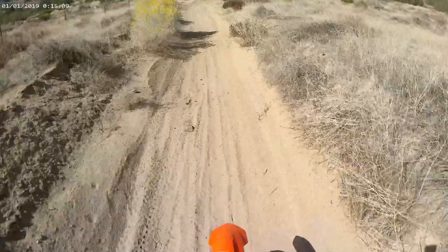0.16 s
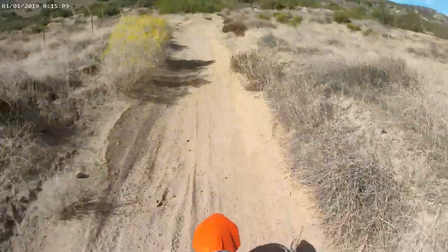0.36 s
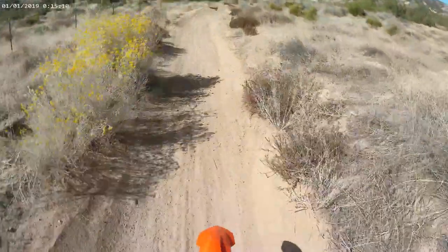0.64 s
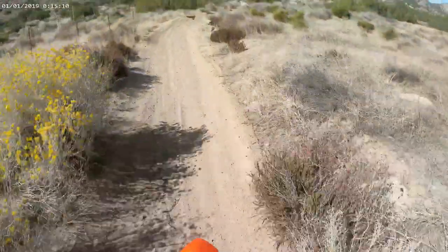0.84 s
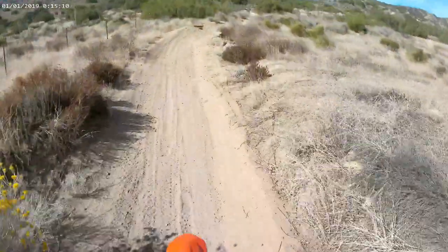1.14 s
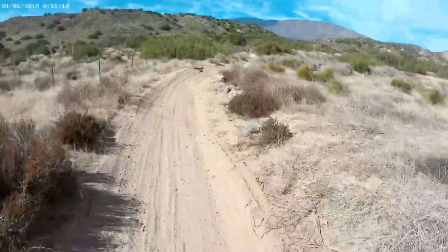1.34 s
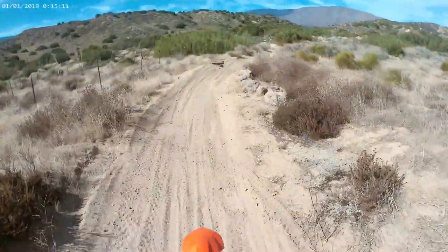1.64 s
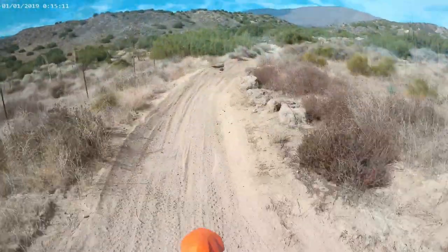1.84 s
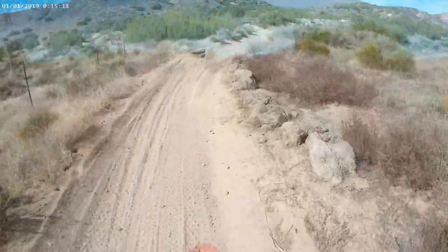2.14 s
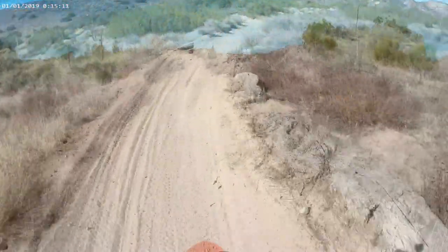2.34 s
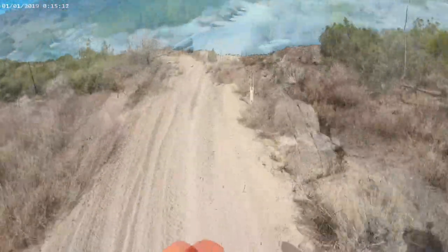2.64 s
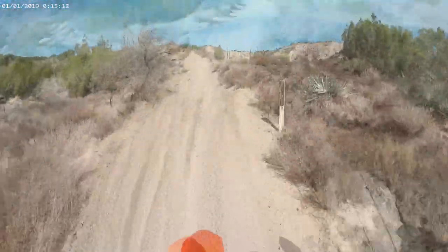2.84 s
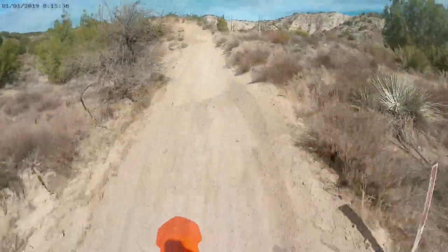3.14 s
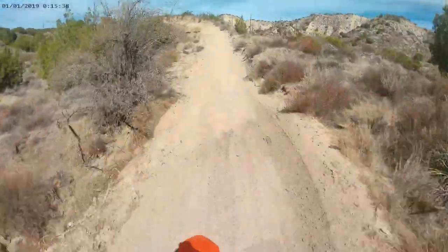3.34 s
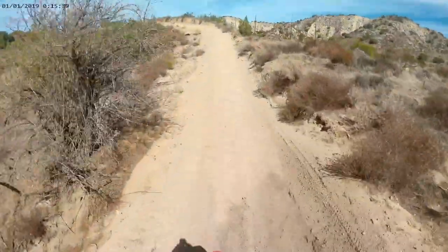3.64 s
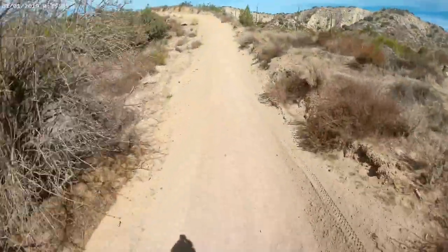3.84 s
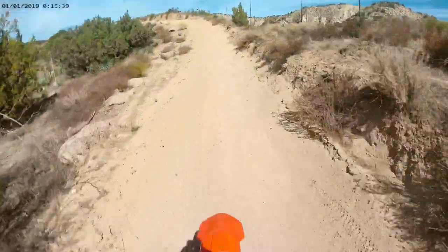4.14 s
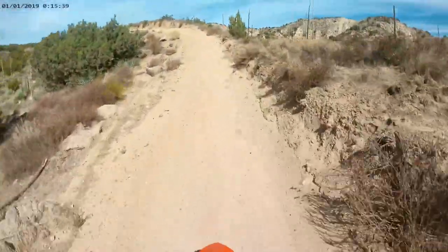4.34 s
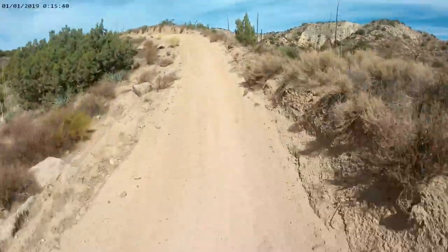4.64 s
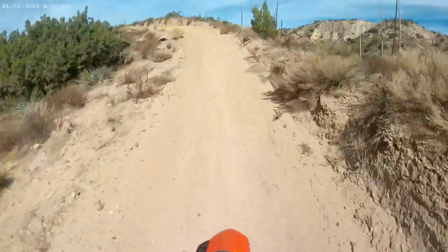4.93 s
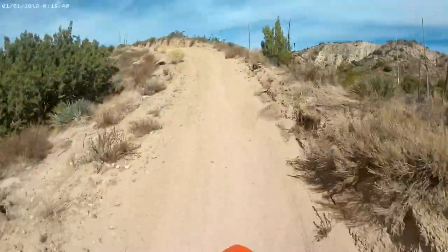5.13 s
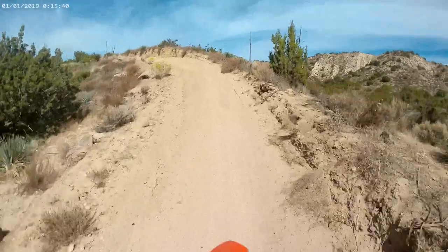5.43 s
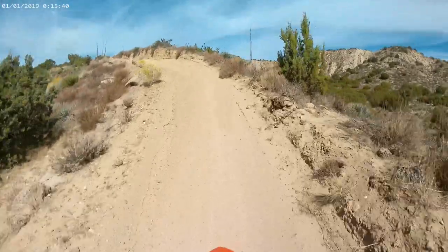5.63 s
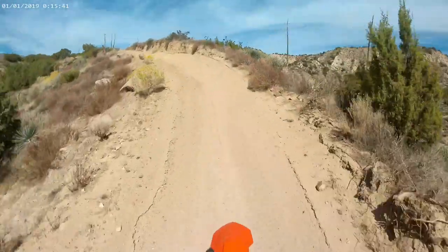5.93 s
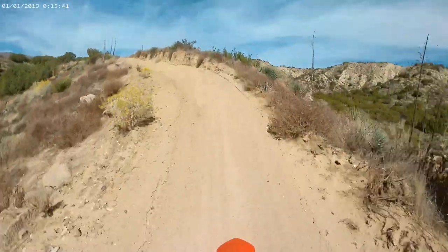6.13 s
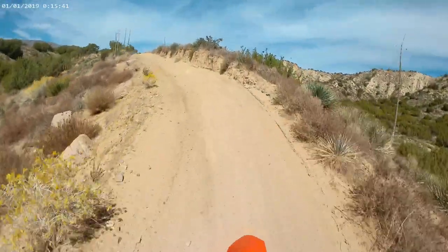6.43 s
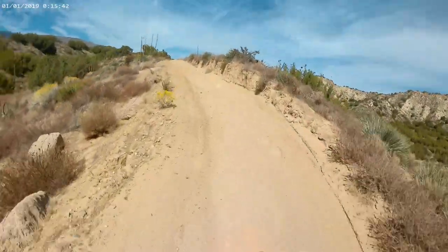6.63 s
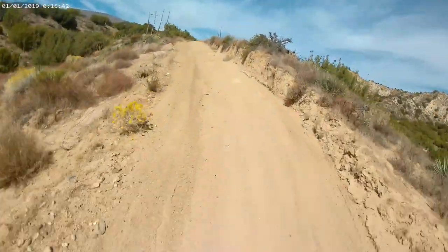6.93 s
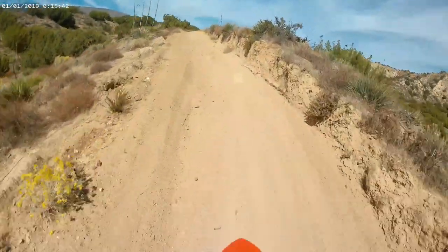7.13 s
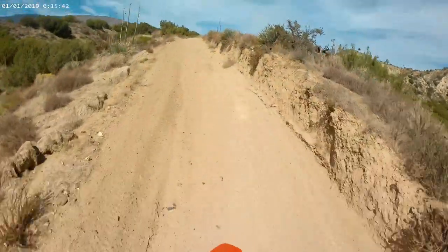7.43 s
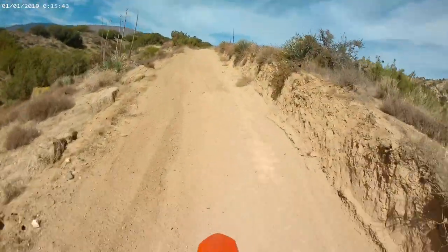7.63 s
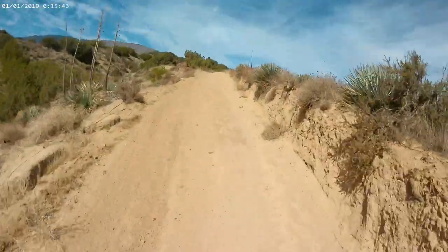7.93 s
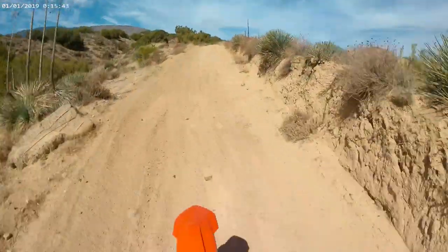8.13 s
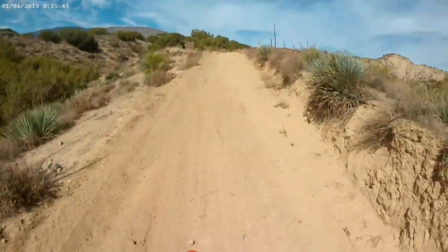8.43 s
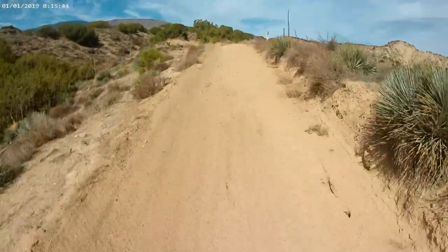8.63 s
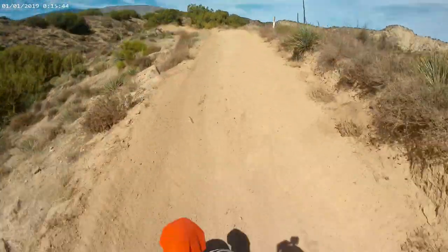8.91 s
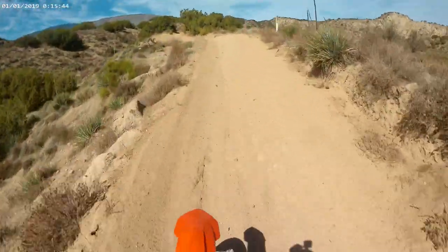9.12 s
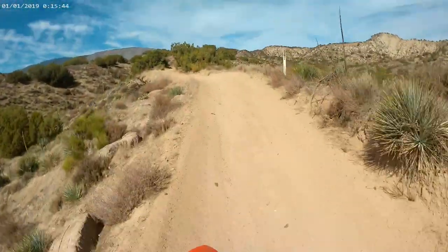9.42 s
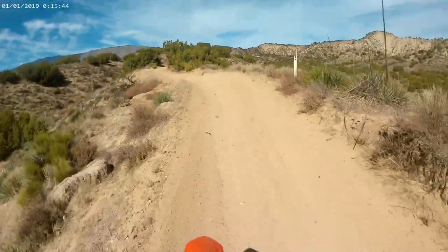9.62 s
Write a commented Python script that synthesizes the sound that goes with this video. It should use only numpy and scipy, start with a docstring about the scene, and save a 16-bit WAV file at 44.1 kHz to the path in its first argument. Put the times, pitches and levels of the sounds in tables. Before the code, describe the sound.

A single-cylinder dirt bike rides a sandy trail outdoors, heard from a camera carried by the rider, close and dry. For the first second the throttle is nearly closed: weak engine thumps, gritty tyre and chain hiss, low wind buffeting and dull knocks near 0.4 and 1.1. At about 1.2 the engine barks open with a coarse rasp and several quick metallic pings until 1.4. It eases from 2 to 2.6, builds to 3.2, then drops briefly around 3.4. From 3.6 it pulls harder, loudest about 4.2 to 4.5, revs fluttering higher near 4.6 to 4.8. Hollow knocks follow, strongest at 5.0, with a stone tick. A steady, rattling climb continues, dipping slightly around 7.1, with bumps near 7 and 7.8 and stone ticks around 8.0 to 8.5. The throttle lifts sharply near 9.0 between two knocks, then returns to a steady pull until the cut at 9.8.

```python
"""Dirt bike on a sandy trail

A single-cylinder dirt bike climbs a sandy trail, heard from a camera carried by the rider.
Each firing rings the exhaust and lets out a rasp of gas; the metal clatters, and chain and tyres hiss as fine grit.
Bumps ring the camera housing, short cracks give engine pings and stones, and low noise buffets the microphone."""
import sys
import numpy as np
from scipy import signal
from scipy.fft import rfft, irfft, next_fast_len
from scipy.io import wavfile
from scipy.ndimage import map_coordinates

SR = 44100
rng = np.random.default_rng(int(sys.argv[2]) if len(sys.argv) > 2 else 0)


def generate_wav(signal):
    """Clip the signal to [-1, 1] and save it as 16-bit WAV at the path in sys.argv[1]."""
    frames = np.transpose(np.atleast_2d(signal))
    scaled = np.clip(frames, -1, 1) * 32767
    pcm = np.round(scaled).astype(np.int16)
    wavfile.write(sys.argv[1], SR, pcm)


N = 430857
TIME = np.arange(N) / SR
SIZE = next_fast_len(N + SR)  # a second of spare room for filter tails
FREQ = np.arange(SIZE // 2 + 1) * SR / SIZE

# Engine speed. Each row: time in seconds, firings per second.
REVS = [(0.0, 22.61), (0.4, 28.39), (0.66, 19.58), (1.2, 24.1), (1.26, 27.18), (1.56, 25.49), (1.92, 27.41),
        (1.98, 32.16), (2.72, 29.17), (3.2, 29.58), (3.5, 23.43), (3.68, 28.34), (3.78, 26.32),
        (4.02, 33.79), (4.36, 30.81), (4.6, 40.88), (4.68, 34.01), (4.74, 41.97), (4.86, 32.86),
        (6.0, 32.68), (6.16, 33.71), (7.1, 30.94), (7.18, 32.42), (7.26, 28.07), (7.54, 34.31),
        (7.74, 29.17), (8.1, 31.68), (8.26, 29.82), (8.7, 35.37), (8.82, 25.66), (9.12, 29.44),
        (9.77, 27.16)]
# Loudness of the exhaust over time. Each row: time in seconds, relative level in dB.
EXHAUST_LEVEL = [(0, -54.5), (.5, -43), (1.02, -53), (1.2, -32.5), (1.91, -33), (2.02, -40.5), (2.6, -39.5),
                 (3.0, -34.5), (3.31, -35.5), (3.43, -43), (3.63, -34), (3.93, -31.5), (4.2, -27.6),
                 (4.46, -27.5), (4.95, -32.5), (5.55, -29), (6.5, -31), (7.1, -33), (8.0, -31),
                 (8.78, -32.5), (8.97, -44), (9.13, -33), (9.77, -32.5)]
# Chain and tyre hiss at a steady pull. Each row: time in seconds, level in dB.
TRAIL = [(0, -39.5), (1.0, -45.5), (1.3, -47), (1.9, -45), (3.5, -47), (4.7, -41.5), (7.2, -45.5),
         (8.1, -40.5), (9.1, -45), (9.77, -44)]
# Strength of the air on the microphone. Each row: time in seconds, relative level in dB.
RIDE = [(0, -28.5), (.75, -26.5), (1.5, -34.5), (3.6, -33.5), (4.25, -29), (5.1, -29), (6.6, -34.5),
        (7.2, -28.5), (9.77, -32)]
# Exhaust resonances at 32 firings a second and average load. Each row: pitch in Hz, width in Hz, level in dB.
PIPE = [(32.3, 4.6, -21), (67, 10, 16), (122.5, 32, -1.5), (219.8, 68, 10), (269.6, 27.3, 8.5),
        (296, 26.7, 7), (442.8, 76, 5.5), (526, 34, -22), (565.6, 42, -4), (622, 20, -9), (827, 100, -9.5),
        (1053, 110, -7.5), (1062, 38, -11)]
# Colour of the gas rasp. Each row: frequency in Hz, relative level in dB.
RASP = [(150, -50), (400, 7), (650, 5.5), (850, -2), (1090, 12), (1300, 0.5), (1520, -6.5), (1680, 3.5),
        (1900, 4.5), (2500, -23.5), (3800, -11), (6000, -23), (9000, -41), (16000, -45)]
# Ringing of the engine's metal. Each row: pitch in Hz, width in Hz, relative level in dB.
METAL = [(1115, 10.8, 10.5), (1509, 77, 6.5), (1813, 32, 4), (1770, 21, -12)]
# Valve blows in each engine cycle. Each row: share of the cycle (0 to 1), relative level in dB.
VALVES = [(0.103, -9), (0.219, -0.5), (0.472, -5.5), (0.631, -1.5), (0.929, 4.5)]
# Colour of the chain and tyre hiss. Each row: frequency in Hz, relative level in dB.
HISS = [(300, 7), (900, 7.5), (2000, 0), (2600, -6), (3450, -3.5), (3750, 7), (4000, 3), (4200, -5),
        (4900, -3.5), (5500, 0), (6250, -3), (6800, -10.5), (9500, -21.5), (15000, -39)]
# Colour of the gusts on the microphone. Each row: frequency in Hz, relative level in dB.
GUSTS = [(5, 1), (16, 3), (31, -6.5), (46, -9.5), (70, -16), (110, -16.5), (280, -27), (1000, -42.5),
         (4000, -82)]
# Knocks over bumps. Each row: start in seconds, relative level in dB,
# basic time to fade by 60 dB in seconds (each housing mode takes its own share of it).
KNOCKS = [(.376, -16, 0.067), (0.628, -21.5, 0.2), (1.076, -11.5, 0.11), (1.113, -14, 0.077),
          (1.289, -11, 0.097), (4.008, -24, 0.22), (4.146, -13, 0.18), (4.85, -11, 0.087), (5.01, -5, 0.15),
          (5.858, -14.5, 0.13), (6.987, -11, 0.078), (7.344, -26, 0.082), (7.784, -11, 0.057),
          (7.969, -17.5, 0.2), (8.941, -14.5, 0.063), (9.117, -15, 0.16)]
# Ringing modes of the camera housing. Each row: pitch in Hz, relative level in dB, share of the fade time.
HOUSING = [(152.1, -1, 0.94), (170, -20, 0.78), (112, -21, 0.9), (320, -18, 0.61)]
# Heavy jolts of the suspension. Each row: start in seconds, relative level in dB, pitch in Hz.
JOLTS = [(0.626, -21, 30.2), (1.19, -23, 31.7), (4.277, -20, 30.6), (4.867, -16.5, 30.6), (5.06, -20, 32.3),
         (7.151, -26, 30.4), (8.189, -28, 31.8), (9.1, -27, 32)]
# Engine pings as the throttle is snapped open at low revs. Each row: start in seconds, level before colouring in dB.
PINGS = [(1.213, -31.5), (1.255, -30.5), (1.294, -29.5), (1.333, -32), (1.368, -22.5)]
# Stones that tick against the bike. Each row: start in seconds, level before colouring in dB.
STONES = [(4.092, -25), (5.014, -28), (7.972, -18), (8.054, -21), (8.117, -17), (8.471, -25)]
# Colour of a tick on the bike's metal. Each row: frequency in Hz, relative level in dB.
TICK = [(400, -9), (1700, 8), (2700, -8), (3900, 2), (6000, -7.5), (9000, -28), (11000, -21), (14000, -53)]

PING_DECAY_S, STONE_DECAY_S = .0061, .002  # seconds to fall to about a third
CLIMB_DB, FLOOR_DB = -30.5, -41  # exhaust level on a steady climb, and where the load levels out
# Rasp on a steady climb in dB and dB per dB of load, before the rasp's own growth and mix level
RASP_DB, RASP_PER_LOAD = -35.5, 1.21
BARK_PER_DB, BARK_S = .58, .45  # rasp dB per dB of surge, and how many seconds the recent mean looks back
CLATTER_DB, CLATTER_PER_LOAD = -41, .7  # clatter on a steady climb in dB, and dB per dB of load
CLATTER_DB_PER_OCTAVE, CLATTER_PER_HISS = 1.5, .61  # dB per doubling of the revs, and dB per dB of trail hiss
HISS_PER_LOAD = .77  # a taut chain and a driven tyre hiss more: dB per dB of load
RASP_WANDER_DB, CLATTER_WANDER_DB, GUST_WANDER_DB = 2.76, 1.6, 2.5  # size of chance swings, several a second
FIRING_WOBBLE = .016  # small random unsteadiness in the timing of the firings, in cycles
TOP_HZ = 15700  # where the treble is cut


def undb(db):
    """Turn decibels into a gain."""
    return 10 ** (np.asarray(db) / 20)


def unit(x):
    """Scale a sound to an average (rms) strength of 1."""
    return x / np.sqrt(np.mean(x ** 2))


def curve(table):
    """Join the points of a two-column table with straight lines, one value per sample."""
    seconds, values = np.transpose(table)
    return np.interp(TIME, seconds, values)


def through(x, response):
    """Filter a sound by a frequency response."""
    return irfft(rfft(x, SIZE) * response, SIZE)[:N]


def resonance(hz, width):
    """Response of one damped ringing mode, with gain 1 at its centre."""
    return 1j * FREQ * width / (hz ** 2 - FREQ ** 2 + 1j * FREQ * width)


def colour(points):
    """Filter with the given outline of (Hz, dB) points that only responds after its input."""
    hz, db = np.transpose(points)
    outline_db = np.interp(np.log(FREQ + 1), np.log(hz), db)
    # folding the cepstrum forward in time gives the filter its minimum delay
    cepstrum = irfft(np.log(undb(outline_db)), SIZE)
    cepstrum[1:SIZE // 2] *= 2
    cepstrum[SIZE // 2 + 1:] = 0
    return np.exp(rfft(cepstrum))


def walk(rate):
    """Smooth random wander through `rate` chance values a second, with a spread near 1."""
    steps = rng.standard_normal(4096)
    return map_coordinates(steps, [TIME * rate], order=2, mode="wrap")


def grains(spread_db):
    """Dense noise whose strength jumps every 32 samples, like tiny grains of unequal size."""
    size_db = spread_db * np.repeat(rng.standard_normal(N // 32 + 1), 32)[:N]
    return unit(rng.standard_normal(N) * undb(size_db))


def crank(rate):
    """Engine cycles turned so far (one firing each), and the seconds since the last firing."""
    turns = np.cumsum(rate) / SR + .48
    turns = turns + FIRING_WOBBLE * walk(11)
    return turns, turns % 1 / rate


def each_cycle(turns, share):
    """The samples at which the engine passes a given point of its cycle."""
    marks = np.arange(1, int(turns[-1]) + 1) + share
    return np.minimum(np.searchsorted(turns, marks), N - 1)


def load(power_db):
    """Load in dB, taken from the exhaust level: near 0 on a steady climb, levelling out when quiet."""
    return 20 * np.log10(np.hypot(undb(power_db), undb(FLOOR_DB))) - CLIMB_DB


def surge(load_db):
    """How far the load stands above its recent mean, in dB."""
    keep = np.exp(-1 / (BARK_S * SR))
    rise_db = load_db - load_db[0]
    recent_db = signal.lfilter([1 - keep], [1, -keep], rise_db)
    return np.maximum(rise_db - recent_db, 0)


def exhaust(turns, rate, power_db):
    """Gas blow-down and the piston's push ring the pipe; louder pulses are steeper with stronger high modes."""
    scatter_db, burble, mode_scatter_db = 1.16, .11, 1.53  # uneven firings; burble is extra dB per dB below mean
    rise_s, push, push_share = .00047, .39, .1987  # pulse build-up time, push gain, push delay in cycles
    heat, heat_per_db, flutter = .28, -.0042, .01  # pitch: power of the revs, share per dB, random share
    echo_s, echo, packing_hz = .0039, .61, 1150
    hz, width, db = np.transpose(PIPE)[:, :, None]
    steepness = 1 + .41 * np.log2(hz / 300)
    t, out, mean_db = TIME[:SR // 12], np.zeros(SIZE), np.mean(power_db)
    for blow_at, push_at in zip(each_cycle(turns, 0), each_cycle(turns, push_share)):
        load_db = power_db[blow_at] - mean_db
        # the quieter firings grow uneven
        firing_luck = (scatter_db + burble * max(-load_db, 0)) * rng.standard_normal()
        mode_luck = mode_scatter_db * rng.standard_normal(hz.shape)
        # higher revs raise the resonances, while load lowers them a little
        pitch = hz * (rate[blow_at] / 32) ** heat
        pitch = pitch * (1 + heat_per_db * load_db + flutter * rng.standard_normal(hz.shape))
        strength = undb(db + steepness * load_db + firing_luck + mode_luck) * width
        modes = strength * np.exp(-np.pi * width * t) * np.cos(2 * np.pi * pitch * t)
        # a weak firing builds up its pressure slowly, so it thumps instead of barking
        ring = np.sum(modes, axis=0) * (1 - np.exp(-t / (rise_s * undb(-load_db))))
        out[blow_at:][:len(t)] += ring
        # the push follows at a fixed crank angle, so the colour sweeps with the revs
        out[push_at:][:len(t)] += push * ring
    # the pulse runs to and fro in the silencer and its baffle, which spread it without changing its colour
    trip = np.exp(-2j * np.pi * FREQ * echo_s)
    silencer = (echo + trip) / (1 + echo * trip) * (1 - 2 * resonance(740, 550))
    # the packing soaks up the treble
    packing = 1 / (1 + 1.2j * FREQ / packing_hz - (FREQ / packing_hz) ** 2) ** 2
    return unit(through(out, silencer * packing)) * np.sqrt(np.mean(undb(power_db) ** 2))


def rasp(age, gas_db):
    """Turbulent gas bursts out after each firing, much more so under load."""
    burst = np.exp(-((age - .0055) / .011) ** 2) + .3 * np.exp(-age / .033)  # main puff and its tail
    puff = (1 - np.exp(-age / .00079)) * burst
    gas = unit(through(puff * grains(4.1), colour(RASP)))
    mean_db = np.mean(gas_db)
    return gas * undb(mean_db + 1.13 * (gas_db - mean_db))  # stretches the swings around the mean


def clatter(turns):
    """Valves strike the metal at fixed crank angles; the gears rattle it all the time."""
    scatter_db, gears_db = 6, 6  # unevenness of the blows, and gear level against the valves
    blows = 0
    for share, db in VALVES:
        at = each_cycle(turns, share)
        blows = blows + np.bincount(at, undb(db + scatter_db * rng.standard_normal(len(at))), N)
    metal = sum(undb(db) * resonance(hz, width) for hz, width, db in METAL)
    treble_cut = 1 + (FREQ / 2300) ** 6
    return unit(through(unit(blows) + undb(gears_db) * grains(1.85), metal / treble_cut))


def hiss(age):
    """Chain and knobbly tyres throw fine grit, a little more with each power stroke."""
    throb = 1 + .35 * np.exp(-age / .016)
    grit = grains(1.9) * throb * undb(walk(45))
    return unit(through(grit, colour(HISS)))


def air(ride_db, power_db):
    """Gusts buffet the microphone, and the shaking keeps the housing droning."""
    gusts = unit(through(rng.standard_normal(N), colour(GUSTS)))
    shaking = grains(4) * undb(1.5 * walk(12))
    drone = unit(through(shaking, resonance(155.7, 98) ** 2))
    return gusts * undb(ride_db - 3) + drone * undb(.5 * ride_db + .28 * power_db - 16)


def bumps():
    """Knocks ring the camera housing as fading tones; heavy jolts rock it slowly."""
    out = np.zeros(N)
    for s, db, t60 in KNOCKS:
        start = int(s * SR)
        t = TIME[:min(SR // 2, N - start)]
        ring = sum(undb(mode_db - 60 * t / (t60 * share)) * np.sin(2 * np.pi * hz * t)
                   for hz, mode_db, share in HOUSING)
        out[start:][:len(t)] -= undb(db) * ring * (1 - np.exp(-t / .0051))  # soft onset
    for s, db, hz in JOLTS:
        t = np.maximum(TIME - s, 0)
        swell = t / .027 * np.exp(1 - t / .028)
        out -= undb(db) * np.sin(2 * np.pi * hz * t) * swell
    return out


def cracks(events, decay_s):
    """Each event is a short, fading burst of noise, coloured by the bike's metal."""
    bursts = np.zeros(N)
    t = TIME[:SR // 20]
    for s, db in events:
        bursts[int(s * SR):][:len(t)] += undb(db) * np.exp(-t / decay_s) * rng.standard_normal(len(t))
    return through(bursts, colour(TICK))


def scene():
    """The exhaust level also steers rasp, clatter and hiss; bumps, ticks, air and a faint steady hiss come on top."""
    rate, power_db, trail_db, ride_db = (curve(table) for table in (REVS, EXHAUST_LEVEL, TRAIL, RIDE))
    turns, age = crank(rate)
    load_db, octaves = load(power_db), np.log2(rate / np.median(rate))
    gas_db = RASP_DB + RASP_PER_LOAD * load_db + BARK_PER_DB * surge(load_db) + RASP_WANDER_DB * walk(9)
    # the metal rattles more with load, revs and a noisy chain
    clatter_db = (CLATTER_DB + CLATTER_PER_LOAD * load_db + CLATTER_DB_PER_OCTAVE * octaves
                  + CLATTER_PER_HISS * (trail_db - np.mean(trail_db)) + CLATTER_WANDER_DB * walk(14))
    pipe = undb(1) * exhaust(turns, rate, power_db) + undb(-5.5) * rasp(age, gas_db)
    metal = undb(clatter_db) * clatter(turns) + cracks(PINGS, PING_DECAY_S)
    trail = undb(trail_db + HISS_PER_LOAD * load_db) * hiss(age) + bumps() + cracks(STONES, STONE_DECAY_S)
    wind = air(ride_db + GUST_WANDER_DB * walk(7), power_db)
    faint_hiss = undb(-67.5) * rng.standard_normal(N)
    return (pipe + metal + trail + wind + faint_hiss)[None]


def record(dry):
    """The camera cuts the top of the treble with a steep low-pass filter."""
    return signal.sosfilt(signal.ellip(10, .2, 80, TOP_HZ, fs=SR, output="sos"), dry)


dry = scene()
out = record(dry)
generate_wav(out)
```